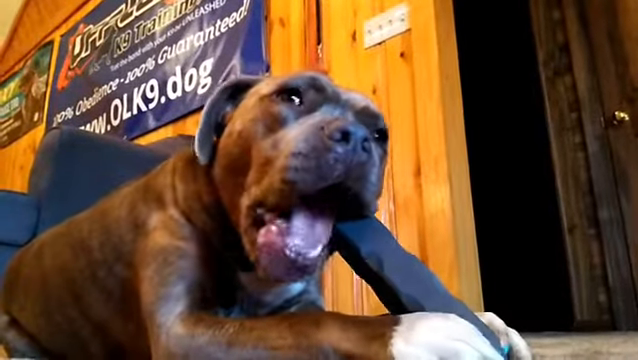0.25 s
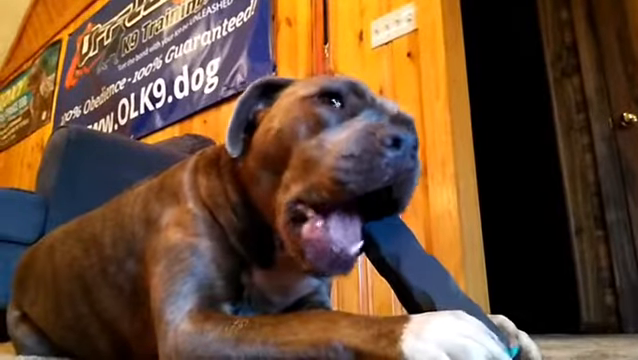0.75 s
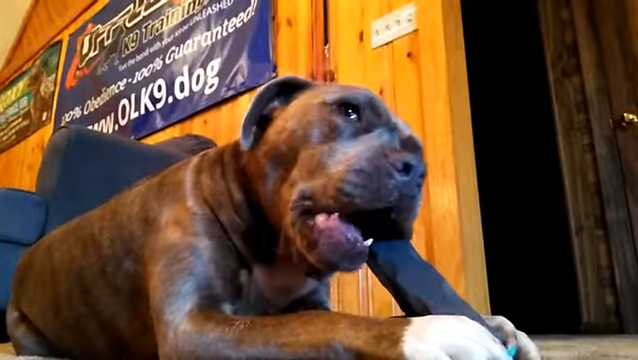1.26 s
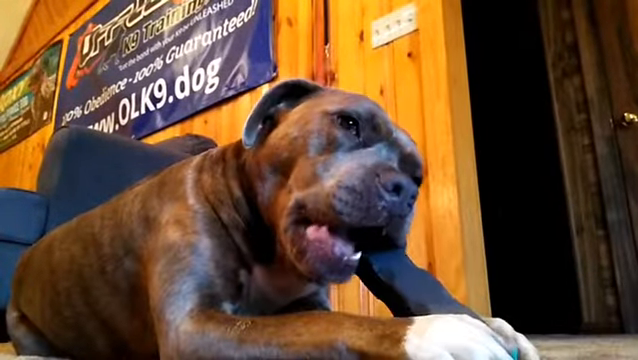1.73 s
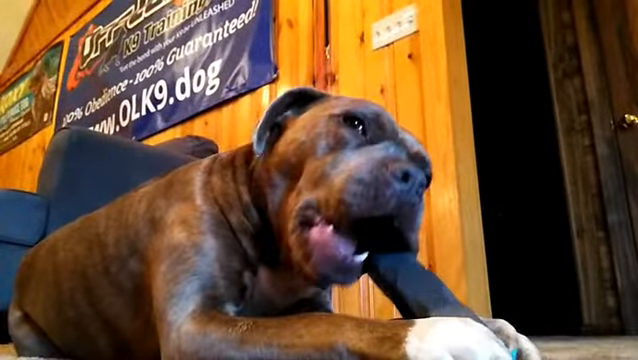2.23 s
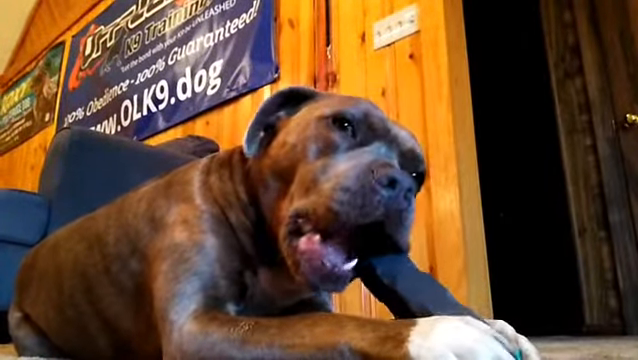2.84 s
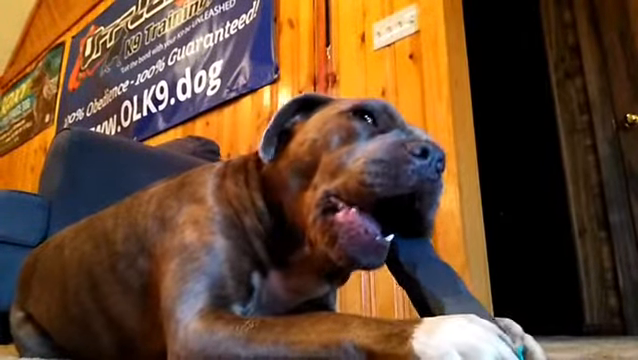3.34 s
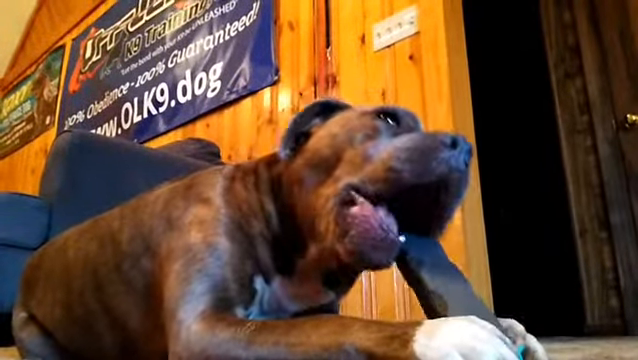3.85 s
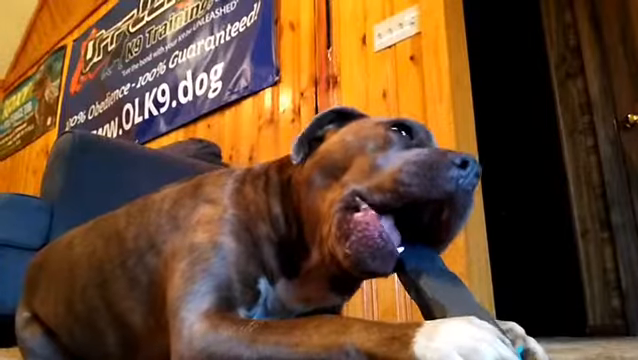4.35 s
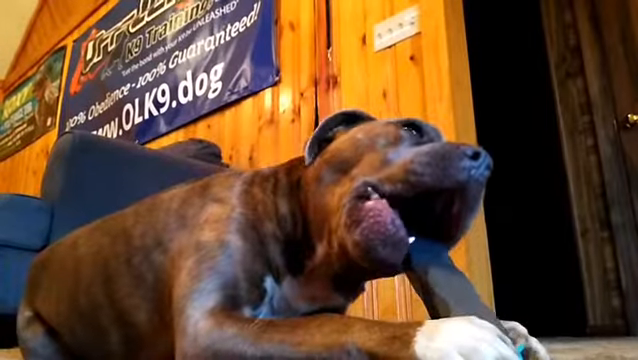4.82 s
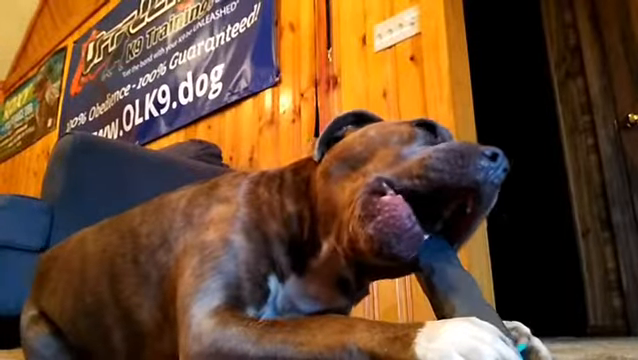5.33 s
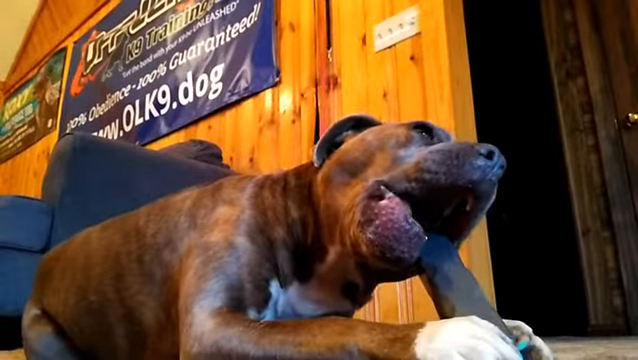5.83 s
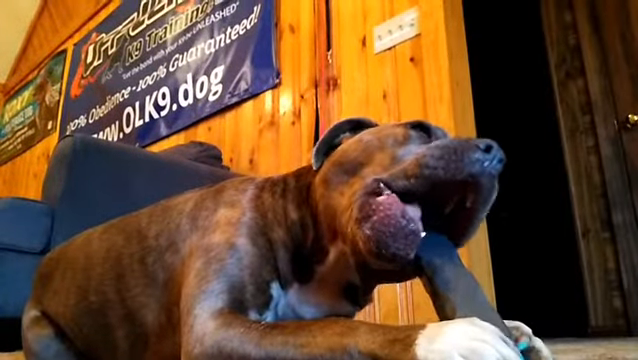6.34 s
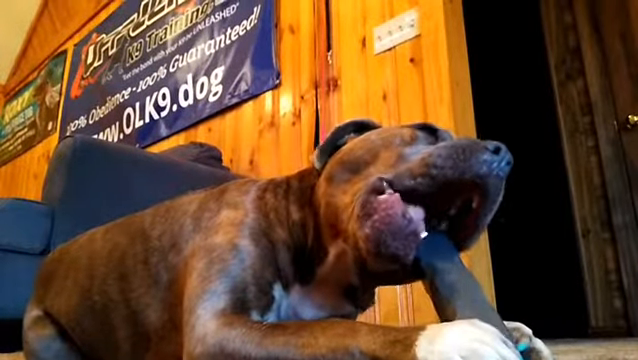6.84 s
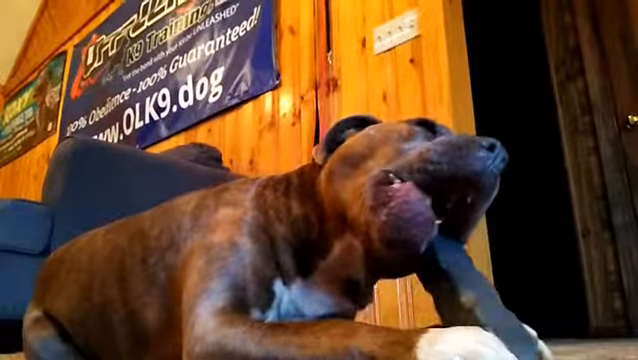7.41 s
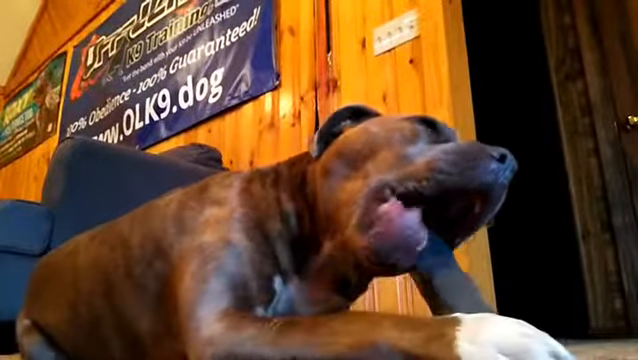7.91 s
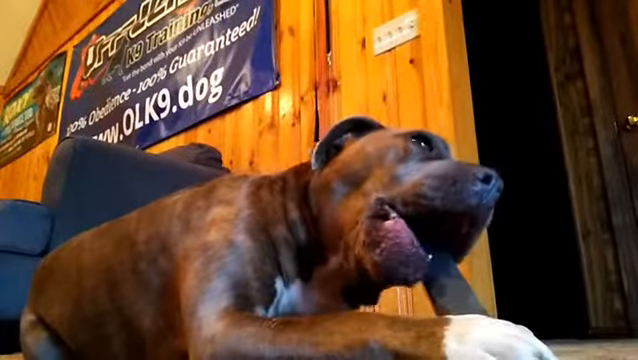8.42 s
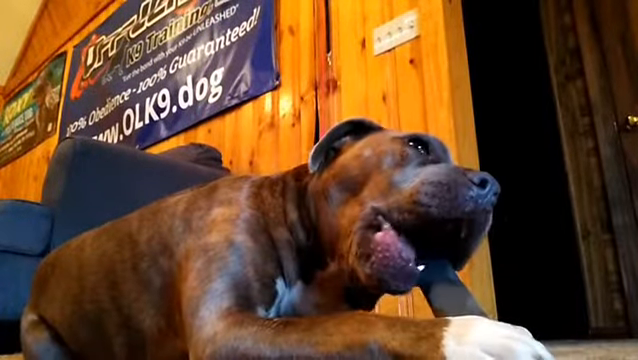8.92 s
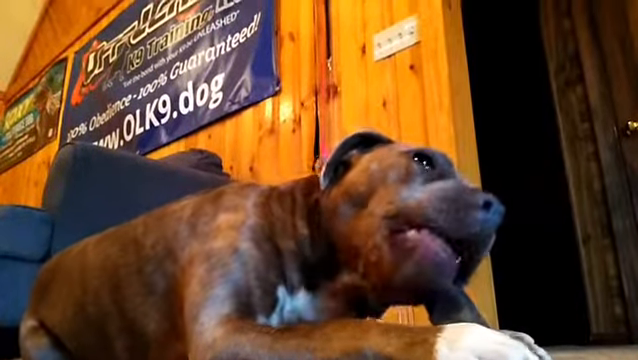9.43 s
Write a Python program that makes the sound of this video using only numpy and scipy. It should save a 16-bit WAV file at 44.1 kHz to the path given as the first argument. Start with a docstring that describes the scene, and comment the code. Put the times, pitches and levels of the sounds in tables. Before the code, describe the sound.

A dog gnaws a hard toy near a stereo microphone in a small panelled room, over a faint wavering low appliance hum and soft air noise. Light clicks and a scrape come at 0.4 s, a small tap at 0.9, and a clearer pinging knock at 1.2. Quiet scraping near 1.9 leads to a cluster of hollow knocks at 2.2-2.4. After a lull, gritty clicks and scrapes return at 3.2-4.1, with sharper knocks at 3.5 and 3.95. Short scrapes and taps follow at 4.4 and 4.9, and a low thud at 5.3. Mostly fine ticks remain until a strong crack and floor thud at 6.5. A rapid crunchy cluster falls at 7.1-7.2, a heavy double knock at 8.4, then ticks and final clicks with light scraping at 9.2-9.6. Faint wet smacks and left-leaning crackle appear between bites.

```python
"""Dog gnawing a hard chew toy

A dog gnaws a hard toy on a wooden floor, close to a phone: tooth slips are bursts of grit driving dying sines,
floor thuds and pings are dying sines, scrapes are click patters through the toy's rings. Lips smack as
band-passed clicks; a fine rustle of dense clicks comes and goes at the left port. An appliance hums and whines
as wavering tones over shaped air noise; random decaying echoes make the small panelled room."""
import sys
import numpy as np
from scipy import signal
from scipy.fft import rfft, irfft
from scipy.io import wavfile
from scipy.ndimage import uniform_filter1d

SR = 44100
rng = np.random.default_rng(int(sys.argv[2]) if len(sys.argv) > 2 else 0)


def transcribe(u):
    """Save the signal u as a 16-bit wav file named by the first command-line argument.

    u: samples, shape (n,) or (channels, n), limited to [-1, 1]; the rate is SR.
    q: integer samples, one column per channel.
    """
    v = np.clip(np.atleast_2d(u).T, -1, 1)
    q = np.round(v * 32767).astype(np.int16)
    wavfile.write(sys.argv[1], SR, q)


def gain_from_db(level_db):
    """Convert decibel levels to linear amplitude factors (20 dB per decade)."""
    decades = np.asarray(level_db, float) / 20
    return 10 ** decades


N = 426447

# tooth knocks: start_s, level_db, toy_hz, end_hz, end_db, crack_db (last two relative to level_db)
BITES = [(0.382, -46, 930, 1580, -15, -32), (0.42, -50, 725, 1180, -1, -11),
         (0.888, -47.5, 900, 1390, 0, -14.5), (1.181, -43, 820, 1560, -13, -48),
         (2.188, -45, 890, 1900, -9.5, -46), (2.218, -47.5, 847, 2050, -15, -42),
         (2.31, -52, 830, 1350, -9, -46), (2.329, -34.5, 780, 1900, -16, -49),
         (2.394, -34, 774, 1250, -10, -31), (3.207, -42.5, 810, 1750, -10, -42),
         (3.218, -42, 867, 1850, -6, -31), (3.256, -46.5, 780, 1770, -7.5, -32),
         (3.261, -49, 755, 1850, -8, -40), (3.461, -30, 786, 1220, -10, -18),
         (3.498, -47.5, 870, 1590, -6, -14), (3.791, -52.5, 936, 1300, 4, -33),
         (3.852, -38, 885, 1280, -16, -39), (3.953, -36, 814, 1390, -7.5, -15),
         (3.987, -51, 850, 1330, -12, -9), (4.093, -46.5, 766, 1290, 4, -6),
         (4.421, -54.5, 781, 1370, 3.5, -35), (4.455, -58, 780, 1400, -1, -37),
         (4.930, -43.5, 795, 1360, 0.5, 3), (4.971, -48, 774, 1210, -6, -18),
         (4.986, -47, 750, 1240, -7, -8), (5.342, -46.5, 870, 1540, -1, -4),
         (6.527, -44.5, 840, 1410, -20, 2), (6.535, -24, 820, 1830, -8.5, -21),
         (6.555, -64, 875, 1910, 4, -16), (6.915, -54, 925, 1540, -5, -9.5),
         (7.078, -43, 860, 1370, -10.5, -47), (7.142, -37, 860, 1290, -5.5, -25),
         (7.151, -37.5, 820, 1380, 0, -12), (7.157, -37.5, 830, 1330, -0.5, -1.5),
         (7.169, -52, 774, 1200, -13, 9), (7.229, -53, 720, 1300, -13, -21),
         (7.545, -66, 915, 1580, 8, -23), (8.17, -42.5, 830, 1510, -13, -32),
         (8.367, -34.5, 867, 1450, 2, -14), (8.39, -44, 810, 2620, -2, -0.5),
         (8.399, -42.5, 820, 1340, -2, -22), (9.22, -43.5, 846, 2230, -11, -16),
         (9.29, -47.5, 848, 1660, -7, -27), (9.325, -28, 816, 1400, -19.5, -15),
         (9.504, -65.5, 855, 1930, 5.5, -11)]
# main ring of the toy, before tuning: mode_hz, level_db, t60_s
TOY_MODES = [(720, -9.5, 0.023), (811, 9.5, 0.042), (820, -19, 0.0026)]
# hollow knock of the mouth: mode_hz, level_db, t60_s
JAW_MODES = [(406, 9.5, 0.019), (504, 5.5, 0.019), (550, -3.5, 0.064)]
# gripped end of the toy: mode_hz, level_db, t60_s
END_MODES = [(1130, 17, 0.0024), (1390, -26.5, 0.07), (1632, -13, 0.022), (2050, -4.5, 0.0057),
             (2480, -35, 0.005)]
# bright crack of the slip: mode_hz, level_db, t60_s
CRACK_MODES = [(2060, 14, 0.0015), (2750, 3, 0.0036), (3040, 0, 0.0045), (3260, -0.5, 0.0062),
               (3900, 8, 0.0025), (4760, -1, 0.002), (5400, -5.5, 0.0035)]
# spectrum of the fine clicks: freq_hz, relative_db
CRACKLE_TONE = [(2350, -2.5), (4000, -5), (5360, -4), (6120, 0), (6670, -7), (7400, 0.5), (10100, 2.5),
                (13800, -3), (15300, -4), (16200, -45)]
# likeness of the two ports: freq_hz, correlation
PORT_LIKENESS = [(60, 0.99), (150, 0.96), (380, 0.83), (950, 0.03), (2380, 0.029), (5980, -0.0), (15000, 0)]


def evened(x):
    """Scales to rms 1."""
    return x / np.sqrt(np.mean(x ** 2) + 1e-20)


def read(points, hz):
    """Reads a spectrum table on a log-frequency axis."""
    f, value = np.transpose(points)
    return np.interp(np.log(hz + 1), np.log(f + 1), value)


def curve(rows):
    """Interpolates a table of (s, value) at every sample."""
    time_s, value = np.transpose(rows)
    return np.interp(np.arange(N) / SR, time_s, value)


def colour(x, db_table):
    """Filters by a spectrum table, without phase shift."""
    hz = np.fft.rfftfreq(len(x), 1 / SR)
    return irfft(rfft(x) * gain_from_db(read(db_table, hz)), len(x))


def sides(x, left_db):
    """Places a sound between the ports; left_db is left minus right."""
    return np.array([x * gain_from_db(left_db / 2), x * gain_from_db(-left_db / 2)])


def add(mix, start_s, peak_db, sound):
    """Mixes in a sound at a peak level."""
    part = mix[round(start_s * SR):][:len(sound)]
    part += gain_from_db(peak_db) * sound[:len(part)] / abs(sound).max()


def ring(modes, chance, axis=1):
    """Dying sines; each blow lands elsewhere, so it weighs and tunes the modes a little differently."""
    t = np.arange(4000) / SR
    spread_db, detune = 2.5, .012
    out = np.zeros(len(t))
    for k, ((hz, db, t60_s), (a, b)) in enumerate(zip(modes, chance)):
        decay = gain_from_db(db + spread_db * a - 60 * t / t60_s)
        rise = (1 - np.exp(-3.5 * t * hz)) ** 2  # about a cycle to swing up
        sign = axis ** k  # axis -1: neighbours swing oppositely, filling the gaps
        out += sign * decay * rise * np.sin(2 * np.pi * hz * (1 + detune * b) * t)
    return out


def dying(rows, t60_s):
    """Power envelope of sudden starts, rows of (s, dB), that die away alike."""
    starts = np.zeros(N)
    for start_s, db in rows:
        starts[round(start_s * SR)] += gain_from_db(2 * db)
    return signal.lfilter([1], [1, -gain_from_db(-2 * 60 / t60_s / SR)], starts)


def air():
    """Room air noise: random short-time spectra with mild drifting patches."""
    # spectrum: freq_hz, relative_db
    spectrum = [(18, -51), (30, 4), (43, -4.5), (65, -3), (90, -17.5), (123, -13.5), (148, -22),
                (281, -18.5), (307, -23.5), (544, -26.5), (715, -33.5), (839, -28), (984, -39),
                (2000, -45.5), (7000, -66.5), (9100, -102), (15400, -120)]
    # port balance: freq_hz, left_minus_right_db
    balance = [(60, -2.5), (130, 3), (290, -4), (640, 9.5), (1410, 1), (3100, -3), (6820, -2), (15000, -13)]
    # depth of the drifting patches: freq_hz, depth_db
    patch_depth = [(100, 2.5), (500, 1.5), (2000, 1.3)]
    # slow change of level: time_s, gain_db
    swell = [(0, 1), (1.3, 3), (9.67, 0)]
    level_db = -48  # before the swell
    frames, hz = N // 512 + 5, np.fft.rfftfreq(2048, 1 / SR)
    a, b, c, d, patches = rng.standard_normal((frames, 1025, 5)).T
    patches = evened(uniform_filter1d(uniform_filter1d(patches, 20, 0), 8, 1))
    same = np.clip(read(PORT_LIKENESS, hz), -1, 1)[:, None]
    left = a + 1j * b
    right = same * left + np.sqrt(1 - same ** 2) * (c + 1j * d)
    lean_db = read(balance, hz)[:, None] / 2
    shape_db = read(spectrum, hz)[:, None] + read(patch_depth, hz)[:, None] * patches
    z = np.array([left, right]) * gain_from_db(shape_db + np.array([lean_db, -lean_db]))
    noise = signal.istft(z, nperseg=2048, noverlap=1536)[1][:, :N]
    return gain_from_db(level_db + curve(swell)) * evened(noise)


def wavering(hz, width_hz, steady):
    """A tone whose strength and phase drift within a narrow band."""
    r = np.exp(-np.pi * width_hz / SR)
    drift = signal.lfilter([1], [1, -r], rng.standard_normal((N, 2)) @ [1, 1j])
    drift = signal.lfilter([1 - r], [1, -r], drift)
    drift = drift / np.sqrt(np.mean(abs(drift) ** 2))
    carrier = np.exp(2j * np.pi * hz * np.arange(N) / SR)
    return evened(((steady + drift) * carrier).real)


def appliance():
    """A low hum that wavers in pitch and strength, and a stack of thin whines."""
    # hum swelling and sinking: time_s, level_db
    hum_level = [(0, -49), (.6, -50), (1.3, -43.5), (2.2, -46.5), (4, -46.5), (5.3, -49), (6.1, -46),
                 (8.4, -47.5), (8.8, -51), (9.67, -48.5)]
    # whines: pitch_hz, width_hz, level_db, left_minus_right_db
    whines = [(121, 14, -57.5, -1), (273, 10, -66.5, 2.5), (546, 10, -69, 0.5), (819, 24, -67, 2.5)]
    hum = gain_from_db(curve(hum_level)) * wavering(59.5, width_hz=11, steady=.8)
    out = np.array([hum, hum])
    for hz, width_hz, db, left_db in whines:
        out += sides(gain_from_db(db) * wavering(hz, width_hz, steady=1.1), left_db)
    return out


def crackle():
    """Dense tiny clicks of uneven size: faint always, in bursts at the left port, and sprayed by each crack."""
    # left-port rustle: start_s, length_s, level_db
    rustles = [(0.037, 0.21, -72), (0.122, 0.037, -68.5), (0.285, 0.047, -72), (0.402, 0.19, -67.5),
               (0.594, 0.047, -77), (0.639, 0.054, -64.5), (0.877, .05, -75.5), (1.574, 0.028, -75),
               (1.703, 0.049, -72), (1.846, 0.057, -76), (2.384, 0.056, -64.5), (3.039, 0.029, -70),
               (3.365, 0.07, -71.5), (3.457, 0.048, -67.5), (3.506, 0.15, -75.5), (3.68, .04, -74.5),
               (3.947, 0.023, -61.5), (3.993, 0.063, -74.5), (4.253, 0.094, -78.5), (4.877, 0.043, -65.5),
               (5.16, 0.068, -73), (5.28, .04, -71), (5.33, 0.12, -79), (5.607, .025, -73),
               (5.71, 0.094, -70.5), (5.825, 0.036, -65), (6.173, 0.1, -77.5), (8.935, 0.14, -79),
               (9.097, 0.018, -57), (9.5, 0.24, -78)]
    edge_s, rustle_left_db, floor_db = 0.035, 25, -86.5
    spray_db, spray_t60_s = -21, 0.044  # against the crack
    linger_db, linger_t60_s = -12.5, 0.47  # against the spray
    size = gain_from_db(3.5 * np.minimum(rng.exponential(1, (N, 2)), 5)) * rng.standard_normal((N, 2))
    sparse = size * (rng.random((N, 2)) < 5000 / SR)  # 5000 clicks per second
    clicks = np.array([evened(colour(port, CRACKLE_TONE)) for port in sparse.T])
    t = np.arange(N) / SR
    rustle = np.zeros(N)  # power, like the spray
    for start_s, length_s, db in rustles:
        inside_s = np.minimum(t - start_s, start_s + length_s - t)
        rustle += gain_from_db(2 * db) * np.clip(inside_s / edge_s + .5, 0, 1) ** 2
    cracks = [(s, db + crack_db + spray_db) for s, db, *_, crack_db in BITES]
    spray = dying(cracks, spray_t60_s) + gain_from_db(2 * linger_db) * dying(cracks, linger_t60_s)
    port_power = gain_from_db([[0], [-2 * rustle_left_db]])
    return clicks * np.sqrt(rustle * port_power + spray + gain_from_db(2 * floor_db))


def smacks():
    """A film of spit tears in a patter of clicks that rings a small cavity between lips and toy."""
    # wet smacks: start_s, level_db, cavity_hz, t60_s
    smack_rows = [(.3, -78, 7500, 0.39), (1.88, -74.5, 5770, 0.29), (2.285, -75, 4300, 0.16),
                  (2.845, -78, 8500, 0.15), (5.84, -79, 5800, 0.37), (6.994, -66.5, 7600, 0.21),
                  (7.48, -75, 6650, 0.3), (8.104, -72.5, 6270, 0.12), (9.632, -80, 6300, 0.55)]
    rise_s, left_db = 0.004, -4.5
    width = 0.17  # half the band, as a share of cavity_hz
    out, t = np.zeros((2, N)), np.arange(SR // 2) / SR
    size = gain_from_db(3.3 * rng.exponential(1, (len(smack_rows), 1, len(t))))
    patter = rng.standard_normal((len(smack_rows), 2, len(t))) * size
    for (start_s, db, hz, t60_s), clicks in zip(smack_rows, patter):
        band = [hz * (1 - width), hz * (1 + width)]
        cavity = signal.butter(3, band, "bandpass", fs=SR, output="sos")
        envelope = np.minimum(t / rise_s, 1) * gain_from_db(db - 60 * t / t60_s)
        sound = evened(signal.sosfilt(cavity, clicks)) * envelope
        part = out[:, round(start_s * SR):][:, :len(t)]
        part += (sound * sides(np.ones(1), left_db))[:, :part.shape[1]]
    return out


def scrapes():
    """Teeth dragged along the toy: a patter of clicks into toy, mouth, gripped end and crack modes."""
    # drags: start_s, length_s, peak_db, end_hz
    drags = [(0.35, 0.21, -49.5, 1400), (1.203, 0.065, -45.5, 1930), (1.834, 0.26, -48.5, 1970),
             (2.162, 0.12, -44.5, 2040), (2.286, 0.25, -46, 1360), (3.19, 0.23, -44.5, 1830),
             (3.465, 0.14, -51, 1500), (4.087, 0.014, -32.5, 1250), (4.415, 0.1, -43, 1380),
             (4.592, 0.085, -49.5, 1580), (4.949, 0.066, -41.5, 1230), (6.516, 0.019, -37, 1540),
             (7.141, 0.015, -31.5, 1390), (7.195, 0.13, -49, 1390), (8.37, 0.05, -39.5, 1470),
             (9.342, 0.24, -52.5, 1420)]
    size = gain_from_db(4 * np.minimum(rng.exponential(1, N), 3)) * rng.standard_normal(N)
    clicks = size * (rng.random(N) < 1200 / SR)  # 1200 clicks per second
    out, still = np.zeros(N), np.zeros((len(CRACK_MODES), 2))
    body = ring(TOY_MODES, still) + 0.6 * ring(JAW_MODES, still)
    body += 0.5 * ring(END_MODES, still) + 0.16 * ring(CRACK_MODES, still)
    for start_s, length_s, db, end_hz in drags:
        u = np.linspace(0, 1, round(length_s * SR))
        pressure = np.minimum(u / 0.13, 1) * (1 - u ** 2)  # quick grip, slow release
        patter = clicks[round(start_s * SR):][:len(u)] * pressure
        grip = 0.58 * ring([(end_hz, 0, .02)], still)
        add(out, start_s, db, signal.oaconvolve(patter, body + grip))
    return out


def ticks():
    """Single fine ticks: noise snaps with a fast and a slow decay, in the tone of the crackle."""
    # ticks: start_s, level_db, left_minus_right_db
    tick_rows = [(0.36, -57, 18), (0.624, -51.5, 24), (0.803, -61, 22), (1.115, -59, 20), (1.1643, -55, 13),
                 (1.713, -55, 19), (2.077, -58, 17), (2.3, -50.5, 14), (2.966, -57, 18), (3.334, -55, 22),
                 (3.468, -59, 14), (3.686, -55, 17), (3.94, -46, 8), (4.114, -50, 17), (4.3003, -54, 19),
                 (4.789, -47.5, 25), (4.878, -53, 25), (5.1765, -46.5, 14), (5.2867, -52, 19.5),
                 (5.4152, -48.5, 13), (5.4965, -53, 16), (5.611, -54, 22), (6.247, -56, 20),
                 (6.532, -53, 7), (6.429, -55, 9), (7.161, -35, -3), (7.633, -44, 0), (8.25, -58, 15),
                 (8.838, -59, -2), (8.935, -53, 15), (9.0, -53, 18), (9.0427, -48, -5), (9.1, -49, 15),
                 (9.145, -55, 18), (9.275, -53, 13), (9.32, -47, 2), (9.5313, -50, 8), (9.567, -51.5, 25)]
    n = np.arange(300)
    decay = np.exp(-n / 16.0) + 0.29 * np.exp(-n / 230.0)
    snaps = rng.standard_normal((len(tick_rows), 2, 300)) * decay
    out = np.zeros((2, N))
    for (start_s, db, left_db), snap in zip(tick_rows, snaps):
        gain = gain_from_db([db]) / np.linalg.norm(snap[0])
        out[:, round(start_s * SR):][:, :300] += snap * sides(gain, left_db)
    impulse = np.eye(1, 512, 256)[0]
    loss = abs(colour(impulse, CRACKLE_TONE)).max()  # an impulse would keep its peak through the filter
    return np.array([colour(side, CRACKLE_TONE) for side in out]) / loss


def bites():
    """A tooth loads, slips in a few milliseconds of grit, and rings toy, mouth and gripped end.

    Returns the near sound and the sound sent into the room, whose cracks ring without grit."""
    near, far = np.zeros((2, N))
    jaw_db, jaw_per_end_db = 4.5, 0.33  # mouth knock grows with the ring of the gripped end
    jaw_lead_s = .0007  # the jaw closes just before the tooth slips
    slip_s = .004  # from loading to slip
    chance = rng.standard_normal((len(BITES), 4, len(CRACK_MODES), 2))
    ms = np.arange(600) / SR * 1000
    swell = (ms / 4) ** 2 * np.exp(2 - ms / 2)  # swells, lets go
    grit = rng.standard_normal((len(BITES), 600)) * swell
    push = np.exp(-((ms - 4) / .1) ** 2)  # the blunt blow within the grit
    for (s, db, toy_hz, end_hz, end_db, crack_db), c, g in zip(BITES, chance, grit):
        end = [(end_hz, 4, .016)] + END_MODES  # the grip sets the pitch of a lasting ring of the end
        toy = [(hz * toy_hz / TOY_MODES[1][0], *rest) for hz, *rest in TOY_MODES]  # and tunes the main ring
        blow = push + .2 * g
        parts = ((toy, 5, c[0], 0),
                 (JAW_MODES, jaw_db + jaw_per_end_db * end_db, c[1], jaw_lead_s),
                 (end, end_db + 6, c[2], 0))
        for modes, share_db, draw, lead_s in parts:
            part = signal.oaconvolve(ring(modes, draw), blow)
            add(near, s - slip_s - lead_s, db + share_db, part)
            add(far, s - slip_s, db + share_db, part)
        crack = ring(CRACK_MODES, c[3], axis=-1)
        gritty = signal.oaconvolve(crack, np.gradient(push) + 0.3 * g)
        add(near, s - slip_s, db + crack_db + 0.5, gritty)
        add(far, s, db + crack_db + 4.0, crack)
    return near, far


def thumps():
    """The toy bumps the floor, which rings in a few low modes."""
    # bumps: start_s, peak_db, floor_hz
    bumps = [(0.42, -40.5, 327), (0.885, -42, 322), (2.217, -39, 255), (2.348, -41.5, 413),
             (3.457, -37.5, 92), (3.789, -41.5, 277), (3.95, -31, 267), (4.09, -30, 99), (4.927, -39, 108),
             (5.342, -28, 150), (5.916, -39, 260), (6.533, -23, 121), (6.911, -42, 314), (7.076, -34, 87),
             (7.15, -29.5, 181.5), (7.165, -31, 122), (8.366, -27.5, 123), (8.396, -27, 80),
             (9.218, -40.5, 280)]
    # floor under the toy: mode_hz, level_db, t60_s
    floor_modes = [(108, 5, 0.078), (150, -14, 0.12), (209.6, -2.5, 0.062), (327, -7.5, 0.037)]
    out = np.zeros(N)
    for (start_s, db, hz), draw in zip(bumps, rng.standard_normal((len(bumps), 5, 2))):
        add(out, start_s, db, ring([(hz, 3, .07)] + floor_modes, draw))
    return out


def pings():
    """Spots of toy and teeth ping, slightly gritty, sliding up as the tooth lets go; low ones last longer."""
    # pings: start_s, peak_db, start_hz
    ping_rows = [(1.241, -32, 780), (1.243, -54, 1970), (1.248, -41, 830), (1.252, -55, 1720),
                 (2.329, -50, 1380), (2.397, -57, 3850), (3.462, -65, 3320), (3.467, -64, 3740),
                 (3.497, -54, 3600), (3.539, -61, 3500), (3.791, -56.5, 2490), (3.949, -48, 1700),
                 (3.953, -55, 3370), (3.954, -52.5, 5300), (3.987, -56, 5300), (4.091, -46.5, 2340),
                 (4.095, -46.5, 1710), (4.443, -55, 1410), (4.931, -34, 607), (4.945, -55, 1350),
                 (4.979, -48.5, 1230), (4.929, -43.5, 1720), (4.93, -44, 2280), (5.345, -51, 3500),
                 (6.533, -31, 1360), (6.535, -47, 5400), (6.537, -37, 3710), (6.916, -57, 3820),
                 (7.142, -52, 2700), (7.153, -43, 2580), (7.159, -55, 3420), (7.163, -45, 5440),
                 (7.165, -41, 3530), (7.219, -58, 4200), (7.538, -49, 1425), (8.367, -32.5, 507),
                 (8.367, -44.5, 2140), (8.366, -44, 2550), (8.367, -42, 3900), (8.391, -40, 440),
                 (8.397, -33, 350), (8.392, -54, 3640), (8.398, -48, 3480), (9.22, -51.5, 1700),
                 (9.221, -59, 3200), (9.29, -60, 3370), (9.324, -40, 3500), (9.33, -47, 2620)]
    rise_s, slide_per_s, roughness = 0.001048, 5.6, 0.066
    t60_s = 0.026  # up to 1 kHz, shorter above
    out, t = np.zeros(N), np.arange(2500) / SR
    grit = uniform_filter1d(rng.standard_normal((len(ping_rows), len(t))), size=30, axis=1)
    for (start_s, db, hz), turn, g in zip(ping_rows, rng.random(len(ping_rows)), grit):
        decay = gain_from_db(-.06 * t * max(hz, 1000) / t60_s)
        shape = (1 - np.exp(-t / rise_s)) ** 2 * decay * (1 + roughness * evened(g))
        cycles = turn + hz * t * (1 + slide_per_s * t / 2)
        add(out, start_s - rise_s, db, shape * np.sin(2 * np.pi * cycles))
    return out


def ports(x):
    """The toy reaches the two ports with unlike level and phase."""
    # level: freq_hz, left_minus_right_db
    balance = [(100, 0), (450, 3), (830, 4), (1900, 1), (3700, 4), (5200, -7), (15000, -3)]
    # phase: freq_hz, left_lead_rad
    lead = [(60, .1), (800, .35), (1500, 0), (2000, 0), (2800, 1), (3700, 1.5), (5500, 1.2)]
    hz = np.fft.rfftfreq(N, 1 / SR)
    half = gain_from_db(read(balance, hz) / 2) * np.exp(.5j * read(lead, hz))
    return irfft(rfft(x) * np.array([half, 1 / half]), N)


def scattered(x):
    """Toward the walls each narrow upper ring leaves at another pitch of its cluster: a broad treble crunch."""
    split = signal.butter(2, 1100, "highpass", fs=SR, output="sos")
    smooth = signal.butter(2, 1000, fs=SR, output="sos")  # sets the width of the blur
    treble = signal.sosfilt(split, x)
    flutter = signal.sosfilt(smooth, rng.standard_normal(N))
    return x - treble + treble * evened(flutter)


def room(x):
    """Dense random echoes, each band dying at its own speed; the bass is alike at both ports."""
    # echo level: freq_hz, send_db
    send = [(100, -17.5), (800, -18), (1500, -13), (2500, -13), (3800, -17), (6000, -24)]
    # decay: freq_hz, t60_s
    decay = [(100, 0.89), (800, 0.29), (2000, 0.33), (4000, 0.3), (9000, 0.12)]
    taps = rng.standard_normal((SR // 2, 2)).T * (np.arange(SR // 2) > 250)
    hz, t, z = signal.stft(taps, SR, nperseg=256)
    same = np.clip(read(PORT_LIKENESS, hz), -1, 1)[:, None]
    z = np.array([z[0], same * z[0] + np.sqrt(1 - same ** 2) * z[1]])
    tail = signal.istft(z * gain_from_db(-60 * t / read(decay, hz)[:, None]), SR, nperseg=256)[1]
    tail = tail / np.linalg.norm(tail[0])
    return signal.fftconvolve(colour(x, send)[None], tail, axes=1)[:, :N]


def scene():
    """Toy near the phone, its echo in the room, crackle, smacks, air and appliance."""
    near, far = bites()
    rest = thumps() + scrapes() + pings()
    echo = room(scattered(far + rest))
    return ports(near + rest) + echo + crackle() + ticks() + smacks() + air() + appliance()


def roll_off(x):
    """The treble ends steeply here."""
    return signal.sosfilt(signal.butter(12, 15800, fs=SR, output="sos"), x)


def record(dry):
    """Microphone hiss and bass roll-off."""
    # hiss spectrum: freq_hz, relative_db
    hiss_tone = [(3000, -44), (6000, 10.5), (10000, 5), (15800, 3)]
    hiss_db = -88.5  # rms
    hiss = [gain_from_db(hiss_db) * evened(colour(port, hiss_tone)) for port in rng.standard_normal((N, 2)).T]
    low_cut = signal.butter(4, 48, "highpass", fs=SR, output="sos")
    mix = signal.sosfilt(low_cut, dry + hiss)
    return roll_off(mix)


dry = scene()
out = record(dry)
transcribe(out)
```